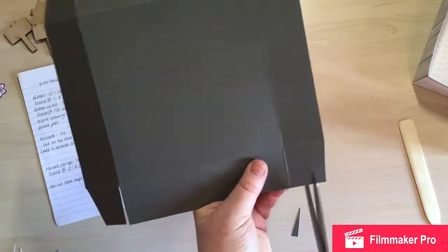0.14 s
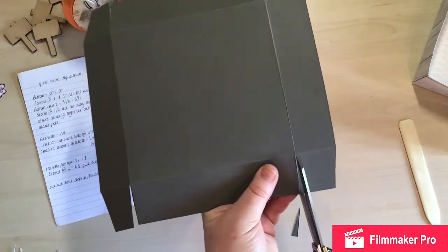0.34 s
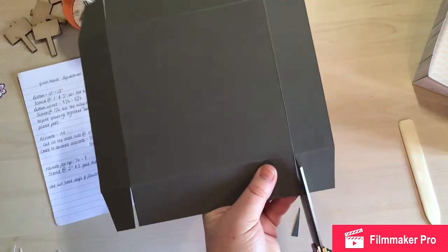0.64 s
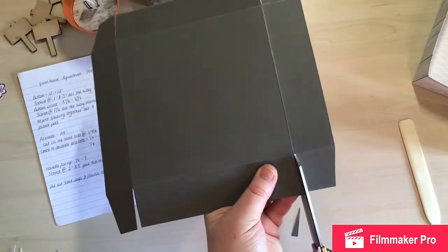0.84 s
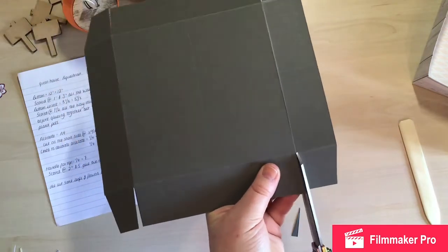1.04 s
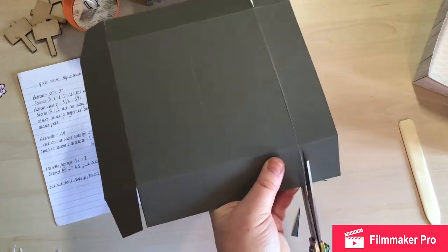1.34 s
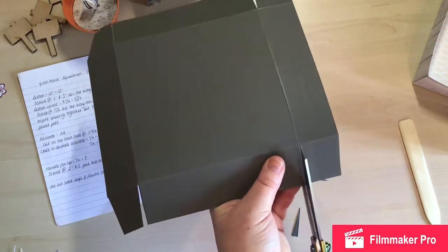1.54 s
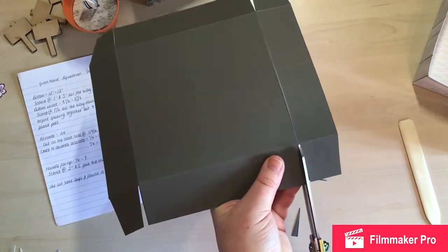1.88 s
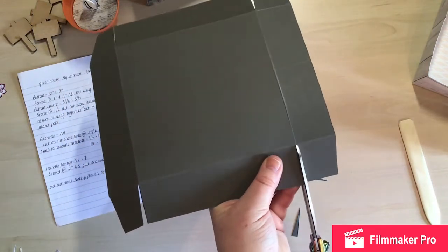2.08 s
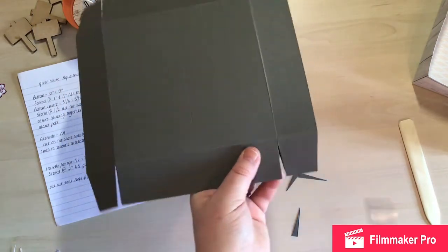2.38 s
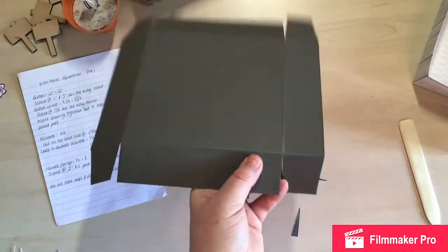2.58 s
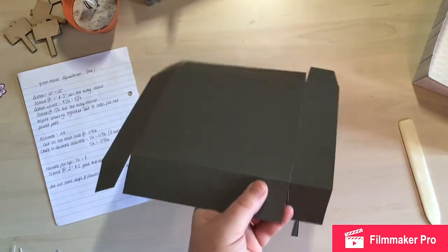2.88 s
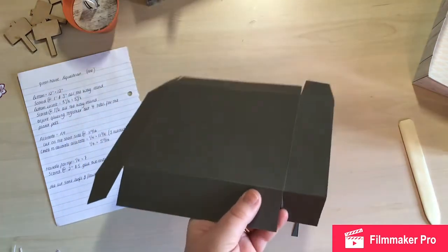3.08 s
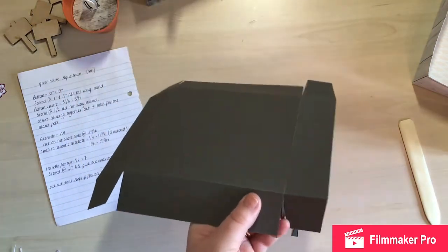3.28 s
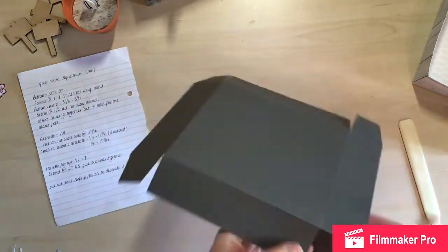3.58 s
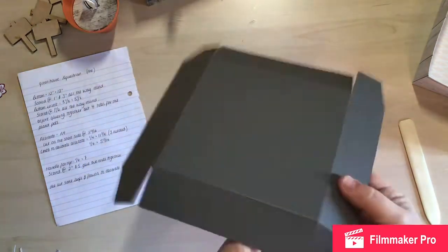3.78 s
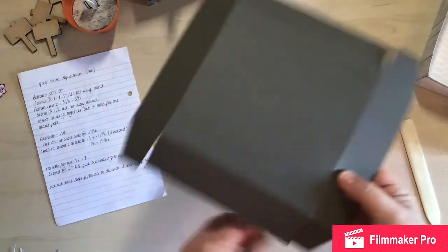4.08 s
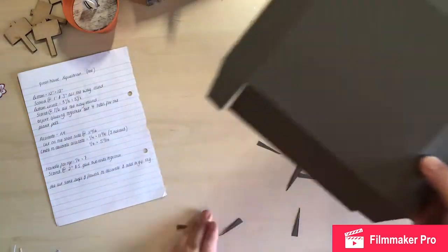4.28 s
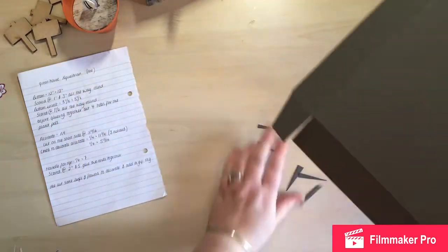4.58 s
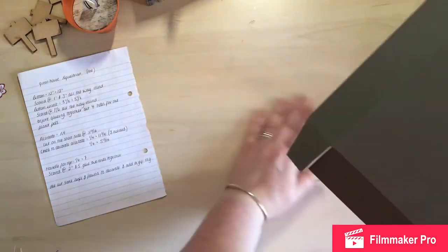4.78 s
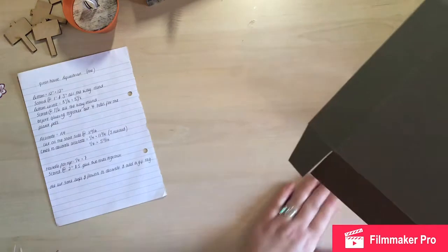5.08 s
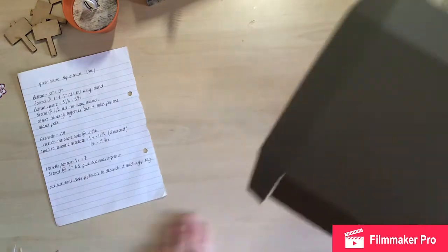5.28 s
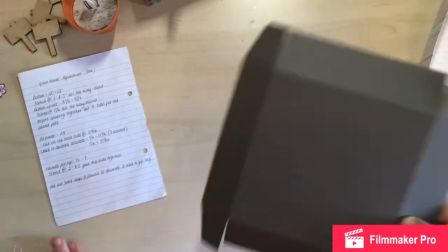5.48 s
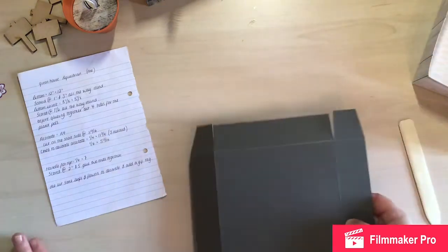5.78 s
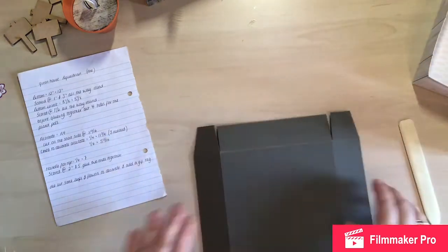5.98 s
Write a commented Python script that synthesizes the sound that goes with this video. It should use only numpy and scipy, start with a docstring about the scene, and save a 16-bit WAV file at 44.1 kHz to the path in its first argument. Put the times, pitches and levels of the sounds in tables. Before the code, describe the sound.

Close, dry craft-table sounds: cardstock snipped twice, scissors put down with a woody knock, card flicking, offcuts brushed aside in short rasps.

```python
"""In a small, quiet room, scissors make two slow cuts in a sheet of cardstock; each ends with a snap shut.
The scissors are drawn out and laid on a wooden table, the card is turned over, a hand sweeps
the offcuts away in three long strokes and one short one, and the card is put down.
Rubbing and cutting are filtered streams of tiny random catches; knocks are short pushes
and bursts of noise that ring resonances; soft thumps are fading low tones."""
import sys
import numpy as np
from scipy import signal
from scipy.fft import rfft, irfft, next_fast_len
from scipy.io import wavfile
from scipy.ndimage import uniform_filter1d, map_coordinates

SR = 44100
rng = np.random.default_rng(int(sys.argv[2]) if len(sys.argv) > 2 else 0)


def master(y):
    """Save y as 16-bit WAV."""
    cut = np.clip(np.atleast_2d(y).T, -1, 1)
    pcm = np.round(cut * 32767)  # scale
    wavfile.write(sys.argv[1], SR, pcm.astype(np.int16))


N = 270767
TIME = np.arange(N) / SR  # seconds since the scene began
AGE = TIME[:SR // 2]  # seconds since one short sound began

# In the tables, t60_s is the time a sound takes to fade by 60 dB.
# Stroke and jerk levels are starting points, before shaping and room echo.


def amp(db):
    """Turn decibels into a gain."""
    return 10 ** (np.asarray(db) / 20)


def unit(x):
    """Scale a sound to an average (rms) level of 1."""
    return x / np.sqrt(np.mean(x ** 2) + 1e-20)


def along(points, hz):
    """Read a curve of (pitch_hz, value) points, spacing pitch as the ear does."""
    f, v = np.transpose(points)
    return np.interp(np.log(hz + 1), np.log(f + 1), v)


def fade(t60, t=AGE):
    """Die away evenly in decibels: 60 dB in t60 seconds."""
    return np.exp(-np.log(1000) * t / np.maximum(t60, 1e-4))


def strokes(rows, attack_s, release_s, level_column=3):
    """Loudness of strokes: pressure builds up, changes steadily while held, then lets go (release_s is a t60)."""
    gain = np.zeros(N)
    for row in rows:
        start_s, length_s, change_db = row[:3]
        t = np.maximum(TIME - start_s, 0)
        hold = amp(row[level_column] + change_db * np.minimum(t / length_s, 1))
        release = fade(release_s, np.maximum(t - length_s, 0))
        gain += np.minimum(t / attack_s, 1) * hold * release
    return gain


def glides(rows):
    """Loudness of smooth hand movements, each a bell with its own rise and fall."""
    bells = []
    for peak_s, level_db, rise_s, fall_s in rows:
        width_s = np.where(TIME < peak_s, rise_s, fall_s)
        bells.append(amp(level_db) * np.exp(-0.5 * ((TIME - peak_s) / width_s) ** 2))
    return np.linalg.norm(bells, axis=0)


def wobble(rate):
    """A smooth random curve through `rate` random points a second."""
    points = rng.standard_normal(int(N * rate / SR) + 4)
    return map_coordinates(points, [TIME * rate])


def add(track, start_s, sound):
    """Mix a sound into the track at start_s."""
    part = track[round(start_s * SR):][:len(sound)]
    part += sound[:len(part)]


def excited(peaks, ring_db):
    """The same resonances, struck harder or softer."""
    return [(hz, width, db + ring_db) for hz, width, db in peaks]


def body(x, spectrum, peaks=(), lag=0):
    """A broad colour plus resonances; bending waves arrive lag seconds late at 1 kHz, lower ones later."""
    size = 2 * next_fast_len(len(x) // 2 + 4096)
    hz = np.fft.rfftfreq(size, 1 / SR)
    power = amp(along(spectrum, hz)) ** 2
    for f, width, db in peaks:
        power = power + amp(db) ** 2 / (1 + ((hz - f) / width) ** 2) ** 2
    # folding the cepstrum makes a filter that answers only after it is struck
    cepstrum = irfft(np.log(power + 1e-12))
    cepstrum[size // 2:] = 0
    cepstrum[0] /= 2
    travel = 4 * np.pi * lag * np.sqrt(1000 * hz)
    response = np.exp(rfft(cepstrum) - 1j * travel)
    return irfft(rfft(x, size) * response)[:len(x)]


# How long the room echo lasts at each pitch: columns pitch_hz, t60_s
ROOM_DECAY = [(100, 0.43), (260, 0.2), (700, 0.22), (1840, 0.18), (4850, 0.17), (12800, 0.13)]


def room(x, wet_db):
    """Direct sound plus a short scattered echo, with its own fading time at each pitch."""
    hz, t, z = signal.stft(rng.standard_normal(len(AGE)), SR, nperseg=256)
    decay = fade(along(ROOM_DECAY, hz)[:, None], t)
    tail = signal.istft(z * decay, SR, nperseg=256)[1][:len(AGE)]
    tail *= 1 - fade(0.018)  # reflections take a moment to build up
    echo = signal.fftconvolve(x, tail / np.linalg.norm(tail))[:len(x)]
    return x + amp(wet_db) * echo


def shifting(x, depth_db):
    """As the contact point travels over the surface, its colour keeps changing."""
    z = signal.stft(x, nperseg=512)[2]
    field = uniform_filter1d(rng.standard_normal(z.shape), size=5, axis=0)
    field = uniform_filter1d(field, size=6, axis=1)
    return signal.istft(z * amp(depth_db * unit(field)), nperseg=512)[1][:len(x)]


def friction(gain, spectrum, rate, spread_db, smooth, peaks=(), shift_db=5.5):
    """Contacts catch and let go about `rate` times a second over smooth rubbing noise, heard in the room."""
    happens = rng.random(N) < rate / SR
    direction = rng.choice([-1, 1], N)
    strength = amp(spread_db * np.minimum(rng.exponential(size=N), 3))
    catches = unit(happens * direction * strength)
    rub = body(catches + smooth * rng.standard_normal(N), spectrum, peaks)
    return room(gain * unit(shifting(rub, depth_db=shift_db)), wet_db=-5.0)


# Mid, low and high parts of a knock: columns from_hz, to_hz
KNOCK_BANDS = [(900, 4000), (45, 900), (4000, 16000)]


def blow(levels, spectrum, t60, crack, wet_db, lag, peaks=(), attack=0.000093):
    """A sharp push rings the resonances while a chatter dies away; hardness sets mid, low and high levels."""
    chatter = rng.standard_normal(len(AGE))
    click = 1.0 * (AGE == 0)
    push = crack * body(click, spectrum, excited(peaks, ring_db=-1.5), lag)
    out = 0
    for db, edges, life in zip(levels, KNOCK_BANDS, [1, 1.05, 0.55]):  # treble dies soonest
        force = chatter * fade(t60 * life) * (1 - np.exp(-AGE / attack))
        force = force / np.linalg.norm(force)
        sound = push + body(force, spectrum, excited(peaks, ring_db=-10.0), lag)
        band_filter = signal.butter(3, edges, 'bandpass', fs=SR, output='sos')
        band = room(signal.sosfilt(band_filter, sound), wet_db)
        loudest = np.sqrt(uniform_filter1d(band ** 2, size=440).max())  # over about 10 ms
        out = out + amp(db) * band / loudest
    return out


# Colour of the room's air: columns pitch_hz, level_db
AIR_COLOUR = [(18, -78), (30, -41), (66, -9), (86, -10), (145, -12), (499, -16.5), (822, -29),
              (9220, -38.5), (16000, -47)]
# A faint resonance in the air: columns pitch_hz, width_hz, level_db
AIR_DRONE = [(434, 11, -6.5)]


def room_air():
    """The room's steady air is filtered noise with one faint resonance."""
    return amp(-68.5) * unit(body(rng.standard_normal(N), AIR_COLOUR, AIR_DRONE))


# Colour of stiff card: columns pitch_hz, level_db
CARD_COLOUR = [(59, -43), (100, 6), (249, 5), (471, 9), (854, -0.5), (1100, -6.5), (1420, -1.5),
               (2370, -4.5), (16000, -31)]


def flick(levels, pitch_hz, t60):
    """A stiff card edge lets go and flexes at its own pitch."""
    flex = [(pitch_hz, 0.2 * pitch_hz, 14)]
    return blow(levels, CARD_COLOUR, t60=t60, crack=0.25, wet_db=-6.0, lag=0.001195,
                peaks=flex, attack=0.00098)


# Card rubs on fingers and table: columns start_s, length_s, change_db over the stroke, level_db
CARD_RUBS = [(0.16, 0.1, -2.5, -53.5), (0.275, 0.044, -3, -59.5), (0.998, 0.058, -3, -67),
             (2.25, 0.18, -7.5, -63), (2.37, 0.28, -6.5, -63.5), (2.72, 0.25, -11, -65),
             (3.592, 0.057, 4, -55.5), (3.79, 0.13, -10.5, -55), (3.946, 0.058, 3.5, -61),
             (4.04, 0.17, -3.5, -71.5), (5.42, 0.099, -8.5, -61), (5.736, 0.063, -1, -59.5),
             (5.795, 0.095, -12, -42.5), (5.952, 0.043, -2.5, -56.5), (6.0, 0.21, 14.5, -71),
             (6.101, 0.045, -8, -52)]
# Colour of the rubbing: columns pitch_hz, level_db
RUB_COLOUR = [(88, -43), (150, -16), (270, -16), (480, -1), (941, -11), (1120, -3), (1600, -11), (2400, -6),
              (16000, -35)]
# Card edges catch, flick and tap: columns start_s, mid_db, low_db, high_db, pitch_hz of the flexing edge
CARD_FLICKS = [(0.163, -66, -60, -63, 2660), (2.1782, -58.5, -65, -49, 4800),
               (2.3267, -68, -73, -55.5, 2240), (2.59, -57, -55.5, -60.5, 1180),
               (3.213, -49.5, -46, -65, 1350), (3.589, -52, -46.5, -55, 480),
               (3.641, -45, -46, -45.5, 2320), (3.656, -44, -43.5, -49, 1820),
               (3.68, -44, -43.5, -58, 1180), (3.689, -67, -47.5, -68, 398), (3.714, -49, -51.5, -59, 1740),
               (3.7754, -45.5, -46, -61, 960), (3.7864, -42.5, -52.5, -53, 1630),
               (3.816, -52.5, -48, -71, 1100), (4.205, -63.5, -71, -52.5, 9300),
               (4.648, -72.5, -58, -83, 1010), (5.7497, -49, -57, -70, 1054),
               (5.8002, -42.5, -74, -52.5, 2300), (5.913, -48, -60, -55.5, 1670),
               (5.9699, -41.5, -61, -59, 1460), (6.113, -42.5, -53, -64, 1640)]


def handling():
    """The sheet rubs and crinkles as it is shifted, and its stiff edges catch and flick."""
    pressure = strokes(CARD_RUBS, attack_s=0.0076, release_s=0.034) * amp(1.4 * wobble(45))
    out = friction(pressure, RUB_COLOUR, rate=700, spread_db=4.0, smooth=0.55, shift_db=2.1)
    for start_s, *levels, pitch_hz in CARD_FLICKS:
        add(out, start_s, flick(levels, pitch_hz, t60=0.052))
    return out


# Blades bite through the card: columns start_s, length_s, change_db over the stroke,
# crunch_db, blade_hiss_db, rasp_pitch_hz
CUT_STROKES = [(0.531, 0.308, 9.5, -58, -64.5, 1000), (1.531, 0.422, -12, -49, -61, 1216)]
# The card gives way in small jerks: columns time_s, level_db
CARD_JERKS = [(0.603, -59), (0.6582, -52), (0.675, -56), (0.7292, -48), (0.7497, -49), (0.7776, -50),
              (0.796, -64.5), (0.813, -63), (0.837, -51.5), (1.6394, -44.5), (1.7204, -51.5), (1.7533, -43),
              (1.7808, -45.5), (1.795, -45), (1.826, -40.5), (1.8398, -42), (1.8559, -45), (1.871, -44)]
# Colour of crunching card: columns pitch_hz, level_db
CRUNCH_COLOUR = [(59, -38), (100, -18), (300, -8), (478, 1.5), (790, -26), (1100, 1), (1440, -10.5),
                 (1580, -2.5), (2780, -10.5), (3760, -16.5), (7000, -33), (9100, -40), (15400, -120)]
# Colour of blades hissing on each other: columns pitch_hz, level_db
BLADE_COLOUR = [(2060, -13.5), (3500, -3), (5290, -3), (7460, -8), (10400, -8.5), (16000, -14)]
# The card's body and the ring of the blades, deep in a cut: columns pitch_hz, width_hz, level_db
DEEP_CUT_PEAKS = [(623, 77, 4.5), (1120, 93, -9), (2830, 180, -0.5)]
STALL_DB, STALL_S = -5, 0.016  # the blades stick just before each jerk
SLIPS_PER_S, SLIP_DROP_DB = 62, 8  # typical pace of the finer stick and slip, and each slip's fall
JERK_LOW_DB, JERK_DEEPENS_DB = -11.5, 12  # a jerk's bass as a cut starts, and its growth by the end
JERK_HISS_DB, JERK_TICK_DB, JERK_HIGH_DB = -2, -2.5, -34  # hiss, tick, tick's treble: against the jerk


def cutting():
    """Blades stick and slip through fibres and hiss on each other; a jerk is a stall, then a surge of crunch."""
    slips = np.cumsum(SLIPS_PER_S * amp(4.1 * wobble(60))) / SR
    grip_db = SLIP_DROP_DB * (0.5 - slips % 1) + 1.0 * wobble(100)  # every slip starts loud and runs out
    for jerk_s, _ in CARD_JERKS:
        grip_db = grip_db + STALL_DB * ((TIME > jerk_s - STALL_S) & (TIME < jerk_s))
    crunch = strokes(CUT_STROKES, attack_s=0.067, release_s=0.04) * amp(grip_db)
    hiss = strokes(CUT_STROKES, attack_s=0.067, release_s=0.04, level_column=4)
    hiss = hiss * amp(grip_db + 1.8 * wobble(100))

    depth = np.zeros(N)  # how far the current cut has gone, 0 to 1
    for start_s, length_s, *_ in CUT_STROKES:
        progress = np.clip((TIME - start_s) / length_s, 0, 1)
        depth = np.where(TIME < start_s, depth, progress)

    ticks = np.zeros(N)
    for jerk_s, level_db in CARD_JERKS:
        surge = amp(level_db) * (1 - fade(0.016)) * fade(0.027)
        add(crunch, jerk_s - 0.002, surge)
        add(hiss, jerk_s - 0.002, amp(JERK_HISS_DB) * surge)
        low_db = JERK_LOW_DB + JERK_DEEPENS_DB * depth[round(jerk_s * SR)]
        levels = level_db + np.array([JERK_TICK_DB, low_db, JERK_HIGH_DB])
        tick = blow(levels, CRUNCH_COLOUR, t60=0.033, crack=0.3, wet_db=-9.0, lag=0.001004,
                    peaks=excited(DEEP_CUT_PEAKS, ring_db=2.0))
        add(ticks, jerk_s - 0.001, tick)

    # the rasp of the first bite gives way to the card's body and the ring of the blades
    colours = [(depth, DEEP_CUT_PEAKS)]
    for start_s, length_s, *_, rasp_hz in CUT_STROKES:
        during = (TIME > start_s) * (TIME < start_s + length_s)
        colours.append(((1 - depth) * during, [(rasp_hz, 160, 9)]))  # pitch Hz, width Hz, dB
    fibres = np.zeros(N)
    for share, peaks in colours:
        fibres += friction(crunch * np.sqrt(share), CRUNCH_COLOUR, rate=520, spread_db=3.5,
                           smooth=0.2, peaks=peaks, shift_db=1)
    blades = friction(hiss, BLADE_COLOUR, rate=600, spread_db=3.0, smooth=0.3,
                      peaks=[(5300, 700, -4), (10300, 1300, -10)], shift_db=1)
    return ticks + fibres + blades


# Blades snap shut, or open against their stop: columns start_s, mid_db, low_db, high_db, t60_s of the chatter,
# shut_ring_db, open_ring_db (both added to the resonances below)
BLADE_SNAPS = [(0.8583, -32, -35, -30, 0.044, 16, -29), (1.112, -27, -43.5, -31.5, 0.04, -28, 11.5),
               (1.9454, -39.5, -46.5, -34.5, 0.053, 11, -20)]
# Colour of a snap: columns pitch_hz, level_db
SNAP_COLOUR = [(71, -41), (120, -14.5), (560, 8), (900, -11.5), (1150, 1.5), (1750, -10.5), (2700, -0.5),
               (4060, -10.5), (9790, -13.5), (16000, -24)]
# Resonances of scissors shut in the card: columns pitch_hz, width_hz, level_db
SHUT_PEAKS = [(640, 120, 2), (1280, 110, -2), (2770, 220, -5), (4900, 600, -17), (9900, 1000, -8)]
# Resonances of scissors wide open: columns pitch_hz, width_hz, level_db
OPEN_PEAKS = [(1110, 100, 1), (1960, 220, -2), (2600, 300, -2), (3250, 180, -9)]


def snaps():
    """Steel meets its stop with a hard click that rings blades and card."""
    out = np.zeros(N)
    for start_s, *levels, t60_s, shut_db, open_db in BLADE_SNAPS:
        ring = excited(SHUT_PEAKS, shut_db) + excited(OPEN_PEAKS, open_db)
        click = blow(levels, SNAP_COLOUR, t60=t60_s, crack=0.56, wet_db=-10.0, lag=0.00055, peaks=ring)
        add(out, start_s, click)
    return out


# Open blades slide along the slit: columns start_s, length_s, change_db over the stroke, card_db, blade_hiss_db
BLADE_SLIDES = [(1.035, 0.069, 0.5, -53.5, -61.5), (1.16, 0.075, -12.5, -51, -66),
                (2.102, 0.079, -13.5, -48, -43.5)]


def sliding():
    """The open blades scrape along the cut edges: card noise plus the hiss of steel."""
    card_gain = strokes(BLADE_SLIDES, attack_s=0.016, release_s=0.036)
    hiss_gain = strokes(BLADE_SLIDES, attack_s=0.016, release_s=0.036, level_column=4)
    card = friction(card_gain, CRUNCH_COLOUR, rate=1000, spread_db=8, smooth=0.86,
                    peaks=excited(OPEN_PEAKS[:1], ring_db=6.5))
    return card + friction(hiss_gain, BLADE_COLOUR, rate=2400, spread_db=3.5, smooth=0.92)


# Skin glides over card and wood: columns fastest_at_s, level_db, rise_s, fall_s (widths of the bell)
SKIN_GLIDES = [(2.3, -73.5, 0.13, 0.13), (3.5, -58.5, 0.031, 0.068), (3.68, -65, 0.1, 0.12),
               (4.38, -62.5, 0.073, 0.3), (4.88, -60, 0.14, 0.13), (5.2, -55, 0.17, 0.12),
               (5.65, -65.5, 0.056, 0.038)]
# Colour of gliding skin: columns pitch_hz, level_db
GLIDE_COLOUR = [(530, -73), (900, -19), (2450, -15.5), (10000, -15), (16000, -19)]


def skin():
    """Skin hisses softly over card and wood, swelling as the hand speeds up and fading as it slows."""
    return friction(glides(SKIN_GLIDES), GLIDE_COLOUR, rate=5600, spread_db=5, smooth=1.4, shift_db=1)


# Scissors touch the table, tips first, then handles: columns start_s, mid_db, low_db, high_db,
# t60_s of the chatter, steel_ring_db (added to the steel resonances), glint_db, thud_pitch_hz
TABLE_LANDINGS = [(2.949, -32, -35, -36, 0.016, 12.5, -14.5, 770),
                  (3.052, -34, -26.5, -53, 0.052, -11, -45.5, 638),
                  (3.0837, -39.5, -35, -48, 0.059, -5, -22, 950),
                  (3.233, -28, -23, -31, 0.046, -10, -8.5, 480),
                  (3.243, -31.5, -23.5, -42, 0.022, -28.5, -34.5, 405),
                  (3.412, -57, -62, -59, 0.0083, 11, -40, 600)]
# Colour of the wood: columns pitch_hz, level_db
WOOD_COLOUR = [(30, -58), (75, -17), (160, -17), (255, -9), (520, -3.5), (1100, -6), (2000, -7),
               (3850, -17), (16000, -35)]
# Resonances of the table top under a hard knock: columns pitch_hz, width_hz, level_db
TABLE_TOP_PEAKS = [(260, 20, 3), (425, 25, 7), (496, 22, 9), (586, 20, 6), (640, 22, 9), (820, 25, 5),
                   (967, 20, 6), (1050, 20, 5), (1118, 20, 1), (1410, 90, -4), (1860, 45, -3)]
# Resonances of the scissors loose on the table: columns pitch_hz, width_hz, level_db
LOOSE_PEAKS = [(786, 80, -1), (1510, 85, -5), (2100, 100, -4), (2310, 100, -4), (3480, 150, -8),
               (4280, 150, -12), (4670, 150, -14), (5280, 180, -15)]
SOFT_DULLS, DULL_ABOVE_HZ = 0.97, 2600  # share of a soft contact's treble loss given to the upper mids


def landings():
    """The scissors clatter onto the wooden top; where steel strikes steel the treble glints."""
    out = np.zeros(N)
    for start_s, mid_db, low_db, high_db, t60_s, ring_db, glint_db, thud_hz in TABLE_LANDINGS:
        wood = excited(TABLE_TOP_PEAKS, low_db + 24.5)  # heavier knocks ring the top more
        steel = excited(LOOSE_PEAKS, ring_db) + [(8520, 640, glint_db), (15300, 2200, glint_db)]
        thud = [(thud_hz, 0.28 * thud_hz, 3)]  # pitch Hz, width Hz, dB
        dulling_db = SOFT_DULLS * (high_db - mid_db)
        colour = [(hz, db + dulling_db * (hz > DULL_ABOVE_HZ)) for hz, db in WOOD_COLOUR]
        knock = blow((mid_db, low_db, high_db), colour, t60=t60_s, crack=0.24, wet_db=-2.5,
                     lag=0.00283, peaks=wood + steel + thud, attack=0.00063)
        add(out, start_s, knock)
    return out


# Soft low thumps of the table, under the landing scissors or the hand:
# columns start_s, level_db before the slow attack
TABLE_THUMPS = [(3.251, -37), (3.612, -51), (4.266, -46.5), (4.614, -49), (4.855, -44), (5.529, -49),
                (5.855, -47)]
# The table top's lowest tones: columns pitch_hz (varied slightly each time), level_db, t60_s
TABLE_TONES = [(79, 0, 0.26), (108, -6, 0.13), (133, -1, 0.2)]


def thumps():
    """Soft pushes reach only the table's lowest tones, which swell gently and fade."""
    out = np.zeros(N)
    for start_s, level_db in TABLE_THUMPS:
        ring = np.zeros(len(AGE))
        for pitch_hz, tone_db, t60_s in TABLE_TONES:
            varied_hz = pitch_hz * rng.normal(1, 0.025)
            ring += amp(tone_db) * fade(t60_s) * np.sin(2 * np.pi * varied_hz * AGE)
        add(out, start_s, amp(level_db) * ring * (1 - fade(0.078)))
    return out


# The hand pushes offcuts over the table: columns start_s, length_s, change_db over the stroke, level_db
OFFCUT_SWEEPS = [(4.38, 0.19, -7, -45.5), (4.839, 0.17, -3.5, -50), (5.107, 0.027, 3.5, -49.5),
                 (5.169, 0.15, -5.5, -46.5)]
# Colour of the scraping offcuts: columns pitch_hz, level_db
OFFCUT_COLOUR = [(100, -21), (170, -15), (250, 0), (550, -1), (1400, 2), (3000, 0.5), (4800, -5.5),
                 (6200, -22), (10000, -36), (16000, -46)]
# A push starts with the offcuts catching: columns start_s, level_db
OFFCUT_CATCHES = [(4.3801, -38), (4.8392, -34.5), (5.1095, -46), (5.125, -54), (5.172, -45.5)]
CATCH_LOW_DB, CATCH_HIGH_DB = -15, -2.5  # bass and treble of a catch, against its mids


def sweeping():
    """Offcuts catch with small flicks, then rasp over the wood."""
    pressure = strokes(OFFCUT_SWEEPS, attack_s=0.0017, release_s=0.078) * amp(0.48 * wobble(37))
    rasp = friction(pressure, OFFCUT_COLOUR, rate=2300, spread_db=3, smooth=0.49, shift_db=1.5)
    for start_s, level_db in OFFCUT_CATCHES:
        levels = (level_db, level_db + CATCH_LOW_DB, level_db + CATCH_HIGH_DB)
        add(rasp, start_s, flick(levels, pitch_hz=2990, t60=0.046))
    return rasp


def scene():
    """All sources over the steady air of the room, as one channel."""
    scissors = cutting() + snaps() + sliding() + landings()
    card_and_hand = handling() + skin() + sweeping()
    return (room_air() + scissors + card_and_hand + thumps())[None]


TOP_HZ = 16100  # upper limit of the sound


def record(dry):
    """A very steep filter takes away the treble above the upper limit."""
    size = next_fast_len(N + SR)
    hz = np.fft.rfftfreq(size, 1 / SR)
    return irfft(rfft(dry, size) / (1 + (hz / TOP_HZ) ** 120), size)[:, :N]


dry = scene()
out = record(dry)
master(out)
```